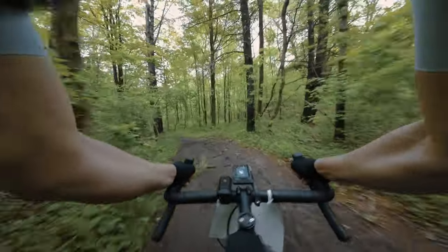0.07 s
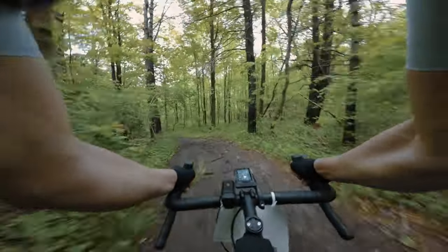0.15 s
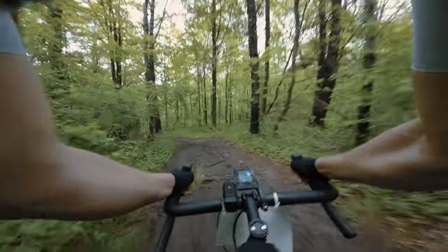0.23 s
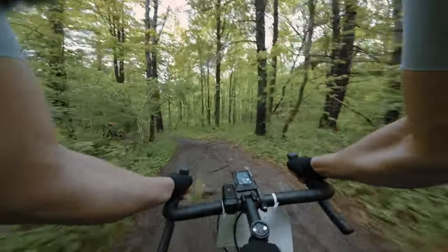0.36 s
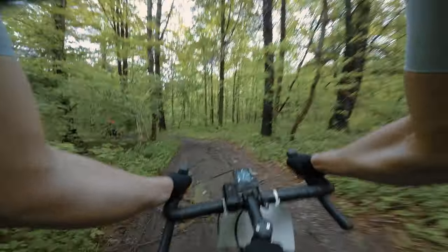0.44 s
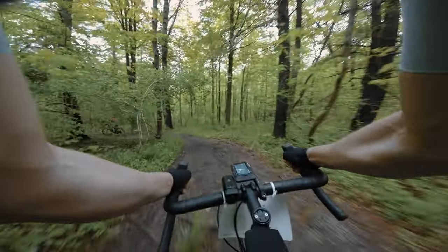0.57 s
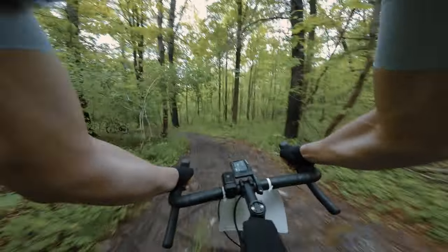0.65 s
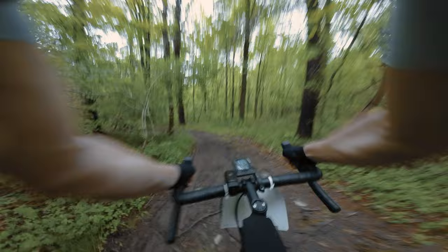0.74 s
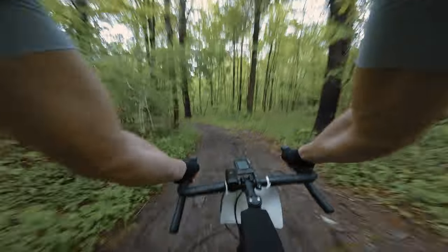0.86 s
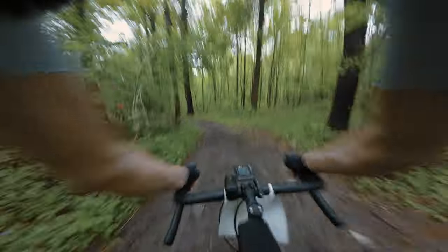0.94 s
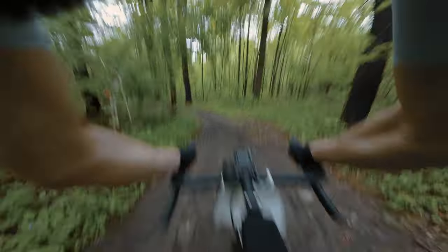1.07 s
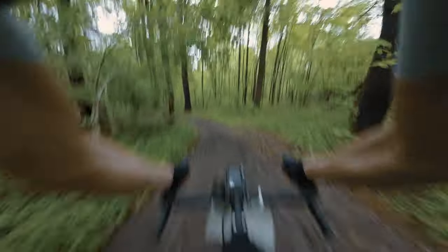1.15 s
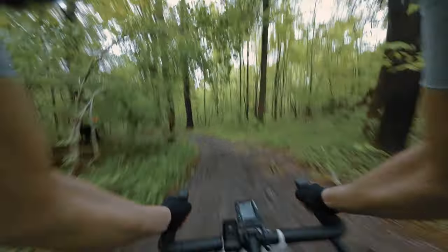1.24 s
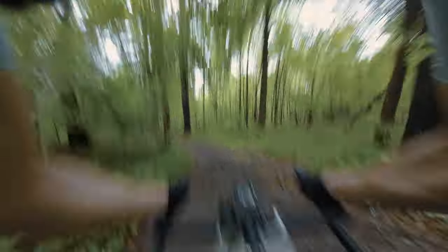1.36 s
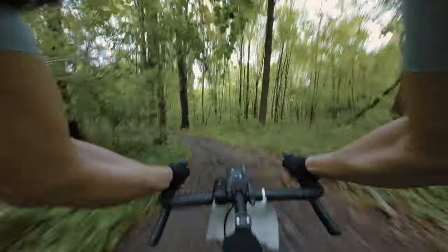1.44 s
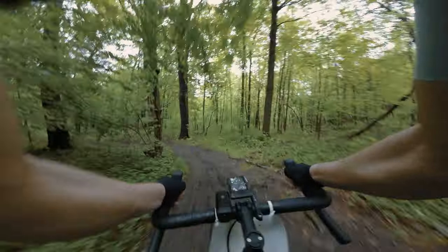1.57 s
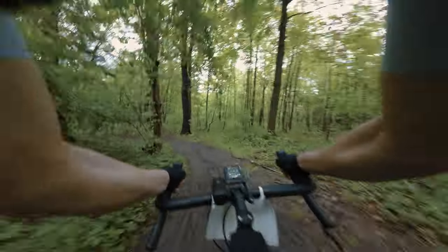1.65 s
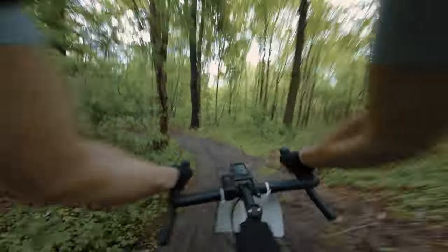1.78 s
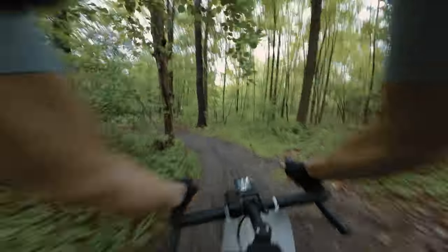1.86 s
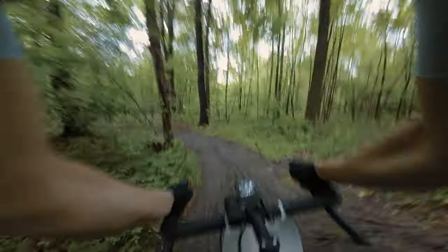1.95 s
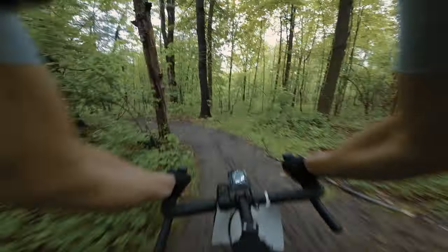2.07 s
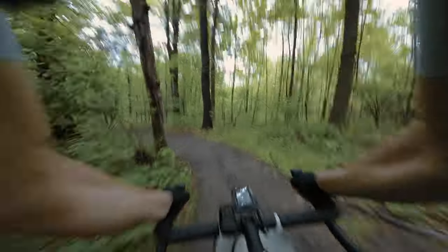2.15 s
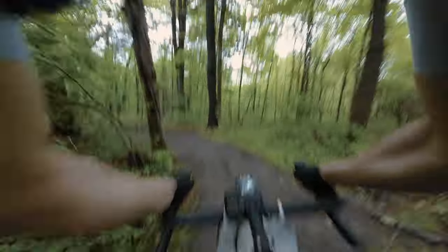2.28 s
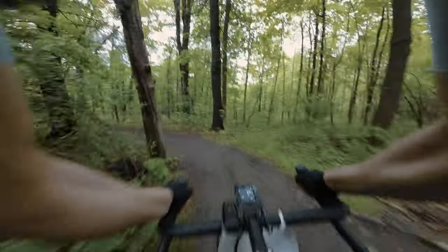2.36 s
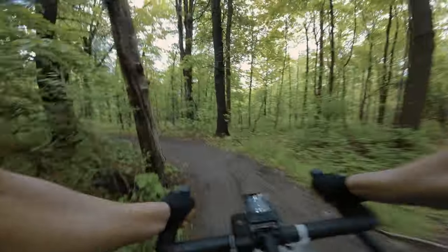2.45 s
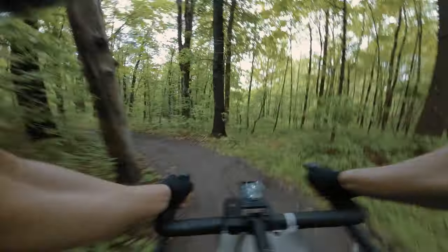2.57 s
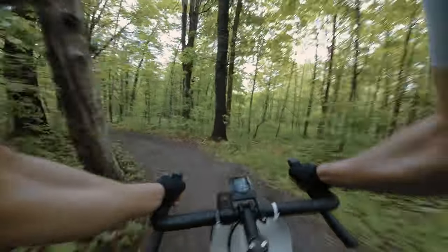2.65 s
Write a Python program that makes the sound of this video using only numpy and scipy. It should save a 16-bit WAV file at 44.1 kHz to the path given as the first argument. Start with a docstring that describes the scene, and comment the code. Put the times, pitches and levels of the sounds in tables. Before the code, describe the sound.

A bicycle coasts fast along a forest dirt trail, freewheel buzzing and tyres hissing under a thin wavering whistle; then roots knock and rattle the frame, with low wind thumps overloading a small chest-worn stereo microphone.

```python
"""Wind buffets the two microphone ports of a small camera on a rider's chest and overloads the right one.
The bicycle coasts fast down a dirt trail: a freewheel buzzes as pawl clicks ring the hub, tyres hiss as
patchy noise on grit, and a thin whistle, part tone and part narrow noise, wavers near 6 kHz.
Roots jolt the bike: hard blows knock the ringing frame and camera mount, small ones rattle, grit crunches."""
import sys
import numpy as np
from scipy import signal
from scipy.fft import rfft, irfft
from scipy.io import wavfile
from scipy.ndimage import uniform_filter1d

SR = 44100
rng = np.random.default_rng(int(sys.argv[2]) if len(sys.argv) > 2 else 0)


def generate_wav(signal):
    """Clip the signal to [-1, 1] and save it as 16-bit WAV at the path in sys.argv[1]."""
    frames = np.transpose(np.atleast_2d(signal))
    scaled = np.clip(frames, -1, 1) * 32767
    pcm = np.round(scaled).astype(np.int16)
    wavfile.write(sys.argv[1], SR, pcm)


N = 121275
T = np.arange(N) / SR  # seconds
RING_SAMPLES = 6000  # length of every frame ring

# Wind pressure at the ports. Each row: time in seconds, relative level in dB, left over right in dB.
BUFFET = [(0.0, -26.5, -23.5), (0.11, -26.5, 11), (0.16, -22, -9), (0.27, -24.5, 2), (0.31, -23.5, -11.5),
          (0.77, -27.5, -11), (0.9, -9, -15), (1.02, -20.5, -10.5), (1.05, -9, -11), (1.58, -18, -6),
          (1.62, -16, -18.5), (1.75, -34, 11), (1.83, -20.5, -8.5), (2.07, -19.5, -10), (2.12, -16, -14.5),
          (2.23, -17, 2), (2.3, -15, -16.5), (2.75, -33, 5)]
# Spectrum of the buffeting at the right port, then the left. Each row: frequency in Hz, relative dB per Hz.
RIGHT_COLOUR = [(1.8, -30), (3.0, 5.5), (16, 6.5), (24, -13), (35, -11), (64, -14.5), (93, -27),
                (260, -45.5), (340, -53), (570, -120)]
LEFT_COLOUR = [(1.8, -28), (3, -41), (8, 3), (22, -12.5), (35, -11.5), (64, -20), (100, -32), (260, -59),
               (400, -90), (600, -120)]
# Strongest pressure lumps on the right port. Each row: centre in seconds, length in seconds,
# signed height (full scale 1).
LUMPS = [(.887, 0.058, 0.94), (0.935, 0.048, -1.2), (1.068, 0.06, -1.01), (1.088, 0.043, -1.09),
         (1.117, 0.047, 1.1), (1.307, 0.054, 0.81)]
OPPOSED = 0.22  # share of the right port's source noise reversed into the left, before colouring
LUMP_ON_LEFT = -0.13  # share of each lump that reaches the left port

# Hard blows to frame and mount. Each row: start in seconds, peak of the ring in dB, crack in dB,
# centre of the ring in Hz, ring length as a share of the frame's.
KNOCKS = [(0.736, -26, -43, 225.6, 0.61), (0.832, -23, -43, 310, 0.54), (0.852, -16.5, -30.5, 482, 0.31),
          (0.888, -26.5, -48, 450, 1), (1.0, -22, -28, 218, 0.45), (1.023, -21, -28, 360.2, .6),
          (1.061, -28, -32, 497, 0.99), (1.125, -19.5, -36, 890, 0.16), (1.147, -21.5, -29, 410, 2.5),
          (1.199, -22.5, -31, 594, 1.3), (1.296, -22, -43, 302, .7), (1.308, -14.5, -31, 560, 0.99),
          (1.317, -8.5, -26, 380, 0.56), (1.325, -9, -28, 340, 0.49), (1.332, -17, -30, 400, 0.47),
          (1.368, -40, -23.5, 400, .5), (1.381, -11.5, -36, 457, 0.33), (1.397, -18, -33, 840, 0.13),
          (1.545, -25, -36, 397, 0.43), (1.5835, -15, -25, 256.4, 0.43), (1.634, -19.5, -31.5, 401, 0.25),
          (1.752, -24.5, -32, 584, .5), (1.761, -28, -30.5, 291, 0.39), (1.911, -23, -26, 402, .6),
          (1.916, -19.5, -20, 947, 0.3), (1.98, -30, -20.5, 1000, 0.88), (2.189, -31.5, -34, 299, .5),
          (2.1994, -12, -27, 553, 0.32), (2.208, -17.5, -27, 598, .5), (2.22, -21.5, -41, 600, 1.8),
          (2.266, -18.5, -29, 261, 0.36), (2.275, -17.5, -32, 197, .4), (2.606, -45, -24.5, 930, 0.44)]
# Modes of frame and camera mount. Each row: frequency in Hz, relative level in dB,
# full 60 dB decay time in seconds (each blow uses a share of it).
FRAME = [(131, 10, 0.057), (227, -4, 0.054), (333.5, -1.5, 0.099), (411.2, -0.5, 0.056), (520, -6.5, 0.02),
         (582.5, 1, 0.062), (722, 2, 0.027), (957, -5.5, 0.021), (1251, -10, 0.077)]
FOCUS_DB_PER_OCTAVE, RISE_S = 18, .0015  # loss away from the ring centre, onset time constant
CRACK_T60_S, CRACK_TREBLE_DB = 0.011, -19  # decay, white noise added to the crack band
SNAP_HZ, SNAP_T60_S, SNAP_DB = 1800, 0.0026, 4.5  # sharp start of each crack; dB over the crack level

# How hard the bike shakes. Each row: time in seconds, relative level in dB.
SHAKE = [(0.0, -63), (0.04, -40), (0.72, -45.5), (0.73, -34), (0.79, -41), (0.855, -25), (0.87, -28.5),
         (0.97, -43), (1.0, -23), (1.06, -21), (1.09, -34), (1.16, -26), (1.18, -37), (1.2, -28),
         (1.22, -37), (1.28, -43), (1.32, -14.5), (1.37, -33.5), (1.39, -39), (1.39, -18), (1.45, -34.5),
         (1.51, -26.5), (1.57, -31), (1.58, -18), (1.6, -38), (1.75, -43), (1.75, -27), (1.79, -33.5),
         (1.89, -58), (1.91, -22.5), (2.03, -37), (2.17, -38), (2.2, -22.5), (2.25, -35), (2.27, -39),
         (2.29, -36), (2.54, -57), (2.64, -32), (2.66, -39.5), (2.75, -35)]
RATTLE_PER_S, RATTLE_SPREAD_DB, RATTLE_DB = 1000, 4, -4.5  # mean blow rate, size spread, gain on SHAKE

# Grit thrown up in the jolts. Each row: time in seconds, relative level in dB.
GRIT = [(0.0, -50), (0.01, -46), (0.63, -48.5), (0.83, -47.5), (0.86, -29), (0.86, -39), (0.97, -44),
        (1.03, -35.5), (1.1, -45.5), (1.13, -35), (1.29, -43), (1.32, -27), (1.38, -35), (1.4, -34.5),
        (1.41, -41), (1.57, -36.5), (1.58, -31), (1.6, -38), (1.9, -45), (1.91, -32.5), (1.97, -32.5),
        (1.98, -39.5), (2.01, -42.5), (2.16, -47), (2.21, -30), (2.22, -38.5), (2.6, -48.5), (2.6, -33),
        (2.64, -53), (2.75, -54)]
# Spectrum of that crunch. Each row: frequency in Hz, relative dB per Hz.
CRUNCH_COLOUR = [(530, 13.5), (900, 1), (2200, 3), (2480, -2.5), (4940, -3.5), (9070, -18.5), (10200, -33),
                 (13600, -36), (15500, -45)]
CRUNCH_DB = 2  # gain on GRIT

# Tyres and air past the body, and the bright top of the crack at 1.91 s.
# Each row: time in seconds, relative level in dB.
HISS = [(0.0, -43), (0.24, -45.5), (0.61, -45.5), (0.72, -46), (0.74, -41.5), (0.79, -45), (0.89, -44.5),
        (0.97, -53.5), (1.0, -42.5), (1.1, -47), (1.13, -43), (1.3, -47.5), (1.32, -46.5), (1.59, -43.5),
        (1.77, -45.5), (1.78, -41.5), (1.86, -47.5), (1.905, -46), (1.912, -35.5), (1.935, -48.5),
        (2.37, -41.5), (2.6, -43.5), (2.61, -40), (2.73, -42.5), (2.75, -38)]
# Spectrum of the hiss. Each row: frequency in Hz, relative dB per Hz.
HISS_COLOUR = [(59, -48), (100, 3), (223, -21), (421, 0.5), (488, -23.5), (729, -13), (863, -6.5),
               (1070, -16.5), (1240, -14.5), (1660, -14), (2480, -8.5), (2880, -11), (3410, -6.5),
               (3950, -15.5), (5780, -7), (6160, -10), (6990, -12), (7610, -10.5), (8820, -16), (10000, -9),
               (11600, -13), (13500, -32.5), (15600, -18)]

# Freewheel buzz. Each row: time in seconds, level in dB.
FREEWHEEL = [(0, -45.5), (.2, -45.5), (.6, -43), (.75, -49.5), (.9, -46), (1.5, -44), (1.8, -44),
             (2.1, -45.5), (2.4, -47.5), (2.75, -51)]
# Mean click rate of the pawls. Each row: time in seconds, clicks per second.
PAWL_RATE = [(0, 65), (.2, 62.5), (.7, 62.3), (.9, 60), (1.5, 62), (1.8, 67), (2.1, 61.5), (2.75, 60)]
# Hub resonances, each passed twice. Each row: frequency in Hz, width of one pass in Hz, relative level in dB.
HUB = [(2020, 130, -2), (2470, 200, 6), (3260, 690, 3.5), (5100, 810, -6), (10650, 9900, 9)]
HUB_TOP_HZ, CLICK_SPREAD_DB = 11800, 1.5  # treble limit, spread of click sizes
RATE_WOBBLE = .02  # rms share of the click rate
PAWL_SNAP = 9  # clean click against the scrape noise

# Thin whistle. Each row: time in seconds, pitch in Hz, relative level in dB.
WHISTLE = [(0.0, 5980, -38.5), (0.04, 6290, -45), (0.11, 6110, -44), (0.12, 6091, -41.5),
           (0.3, 6240, -40.5), (0.33, 6370, -45), (0.38, 6250, -37), (0.4, 6524, -52), (0.46, 6400, -46),
           (0.47, 6390, -36), (0.5, 6220, -40), (0.54, 6449, -49), (0.56, 6170, -39), (0.6, 6060, -37.5),
           (0.61, 6300, -46), (0.63, 6440, -48), (0.65, 6091, -40), (0.73, 6309, -47), (0.79, 6010, -50),
           (0.8, 6490, -62), (0.91, 6503, -48.5), (1.0, 6063, -34), (1.02, 6175, -59), (1.07, 6110, -55),
           (1.08, 6300, -65), (1.18, 5900, -64), (1.21, 6432, -52), (1.22, 5870, -55), (1.27, 6507, -62),
           (1.28, 6050, -71), (1.34, 6420, -57), (1.35, 6007, -59), (1.46, 6427, -50), (1.49, 6100, -50),
           (1.52, 6590, -55), (1.55, 5920, -58), (1.59, 6530, -61), (1.62, 6158, -50), (1.64, 6440, -43),
           (1.69, 6347, -49), (1.72, 6250, -59), (1.81, 6390, -53), (1.83, 6080, -46), (1.9, 6100, -37),
           (1.94, 6100, -49), (1.97, 6550, -55), (2.02, 6440, -49), (2.12, 6500, -73), (2.24, 6400, -43),
           (2.3, 6080, -40), (2.32, 6393, -47), (2.4, 6030, -37), (2.55, 6410, -51), (2.57, 6150, -37.5),
           (2.7, 6540, -50), (2.75, 6190, -55)]
FLUTTER_HZ, BREAK_DB = 70, 2.2  # largest pitch flutter, rms of the level breaks
ROUGH_SHARE, CLEAR_SHARE = 0.65, .75  # amplitudes of the narrow noise and the clear sine

# Likeness of the two ports. Each row: frequency in Hz, left-right likeness (1 is identical).
SAME = [(60, -0.09), (130, 0.9), (290, 0.99), (640, 0.98), (1410, 0.98), (3100, 0.83), (6820, 0.37),
        (15000, -0.021)]
# Balance of the two ports. Each row: frequency in Hz, left over right in dB.
LEAN = [(60, -3.0), (110, -3.5), (200, 1.5), (380, 0), (700, -0.5), (1290, 0.5), (2380, -2), (4400, -3.5),
        (8120, -1.5), (15000, 5)]
EDGE_HZ = 15850  # upper limit of the sound


def gain_of(db):
    """Amplitude factor of a level in dB."""
    return 10 ** (np.asarray(db) / 20)


def evened(x):
    """Scale each channel to rms 1."""
    return x / np.sqrt(np.mean(x ** 2, -1, keepdims=True) + 1e-20)


def read(points, hz):
    """Read a spectrum table along a logarithmic frequency axis."""
    f, value = np.transpose(points)
    return np.interp(np.log(hz + 1), np.log(f + 1), value)


def curve(table, column):
    """Draw straight lines through one table column over time."""
    rows = np.array(table)
    return np.interp(T, rows[:, 0], rows[:, column])


def coloured(x, points):
    """Shape a sound by a spectrum table, at rms 1."""
    hz = np.fft.rfftfreq(N, 1 / SR)
    return evened(irfft(rfft(x) * gain_of(read(points, hz)), N))


def wander(rate_hz):
    """Random drift of rms 1: noise low-passed at rate_hz."""
    b, a = signal.butter(2, rate_hz, fs=SR)
    return evened(signal.lfilter(b, a, rng.standard_normal(N)))


def resonate(x, hz, width):
    """A resonance of gain 1 that can follow a pitch curve: shift to 0 Hz, smooth, shift back."""
    turn = np.exp(2j * np.pi * np.cumsum(hz * np.ones(len(x))) / SR)
    r = np.exp(-np.pi * width / SR)
    return 2 * (turn * signal.lfilter([1 - r], [1, -r], x / turn)).real


def ring(hz, db, t60):
    """One mode after a blow: a sine that decays exponentially."""
    t = T[:RING_SAMPLES]
    return gain_of(db - 60 * t / t60) * np.sin(2 * np.pi * hz * t)


def wind():
    """Lumpy pressure on each port, partly opposed, and a few big lumps on the right."""
    lean = curve(BUFFET, column=2) / 2
    left, right = rng.standard_normal((2, N))
    air = np.array([coloured(left - OPPOSED * right, LEFT_COLOUR), coloured(right, RIGHT_COLOUR)])
    air = air * gain_of(curve(BUFFET, column=1) + 2.0 + np.array([lean, -lean]))
    for s, length, height in LUMPS:
        lump = np.cos(np.pi * np.clip((T - s) / length, -.5, .5)) ** 2
        # The lump displaces the buffeting on the right port.
        air[1] = air[1] * (1 - np.minimum(1.85 * lump, 1)) + height * lump
        air[0] = air[0] + LUMP_ON_LEFT * height * lump
    return air


def knocks():
    """Single hard blows: frame modes nearest in pitch to the ring centre sound most, with a short crack."""
    out, t = np.zeros(N + RING_SAMPLES), T[:RING_SAMPLES]
    white = rng.standard_normal((len(KNOCKS), RING_SAMPLES))
    crack_band = signal.butter(2, [800, 3600], "band", fs=SR, output="sos")
    cracks = evened(signal.sosfilt(crack_band, white)) + gain_of(CRACK_TREBLE_DB) * white
    for (s, db, crack_db, centre_hz, share), noise in zip(KNOCKS, cracks):
        tone = np.zeros(RING_SAMPLES)
        for k, (hz, mode_db, t60) in enumerate(FRAME):
            focus_db = FOCUS_DB_PER_OCTAVE * abs(np.log2(hz / centre_hz))
            sign = (-1) ** (k // 2)  # modes start in differing directions
            tone += sign * ring(hz, mode_db - focus_db, t60 * max(share, .1))
        tone = tone * (1 - np.exp(-t / RISE_S))
        knock = gain_of(db) * tone / abs(tone).max()
        crack = gain_of(crack_db - 60 * t / CRACK_T60_S) * noise
        snap = ring(SNAP_HZ, crack_db + SNAP_DB, SNAP_T60_S)
        out[round(s * SR):][:RING_SAMPLES] += knock + crack + snap
    return out[:N]


def rattle():
    """Dense small blows, each on one random frame mode, ring as hard as the bike shakes."""
    size = gain_of(RATTLE_SPREAD_DB * np.minimum(rng.exponential(1, N), 3))
    struck = rng.random(N) < RATTLE_PER_S / SR
    blows = size * struck * rng.choice([-1, 1], N)
    mode = rng.integers(0, len(FRAME), N)
    body = np.zeros(N)
    for k, (hz, db, t60) in enumerate(FRAME):
        body += signal.oaconvolve(blows * (mode == k), ring(hz, db, t60 * .5))[:N]
    return gain_of(curve(SHAKE, column=1) + RATTLE_DB) * evened(body)


def crunch():
    """Grit thrown up in the jolts: coloured noise with a fast random flicker."""
    noise = rng.standard_normal((2, N))
    flicker = gain_of(1 * wander(rate_hz=130.0))  # 1 dB rms
    return gain_of(curve(GRIT, column=1) + CRUNCH_DB) * coloured(noise * flicker, CRUNCH_COLOUR)


def hiss():
    """Tyres on grit, air past the body and the top of the crack at 1.91 s: patchy noise, shared flicker."""
    noise = rng.standard_normal((2, N))
    _, _, z = signal.stft(noise, SR, nperseg=256, noverlap=192)
    patches = uniform_filter1d(rng.standard_normal(z.shape[1:]), 6, 0)  # smooth across pitch
    patches = uniform_filter1d(patches, 30, 1)  # smooth across time
    patchy = z * gain_of(1.98 * patches / patches.std())
    noise = signal.istft(patchy, SR, nperseg=256, noverlap=192)[1][:, :N]
    level_db = curve(HISS, column=1) + 6.5 + 1.58 * wander(rate_hz=45.0)
    return coloured(noise, HISS_COLOUR) * gain_of(level_db)


def freewheel():
    """Each pawl click is a clean tick and a short soft scrape of noise that ring the hub."""
    rate = curve(PAWL_RATE, column=1) * (1 + RATE_WOBBLE * wander(rate_hz=15.))
    turns = np.cumsum(rate) / SR  # clicks so far
    size = gain_of(CLICK_SPREAD_DB * rng.standard_normal(400))[turns.astype(int)]
    u = (turns % 1) / 0.082  # the scrape peaks 0.082 of the way to the next click
    tick = np.diff(np.floor(turns), prepend=0)
    scrape = size * (u * np.exp(-u) * rng.standard_normal((2, N)) + PAWL_SNAP * tick)
    hub = np.zeros((2, N))
    for channel, x in enumerate(scrape):
        for hz, width, db in HUB:
            hub[channel] += gain_of(db) * evened(resonate(resonate(x, hz, width), hz, width))
    hub = signal.sosfilt(signal.butter(10, HUB_TOP_HZ, fs=SR, output="sos"), hub)
    return evened(hub) * gain_of(curve(FREEWHEEL, column=1))


def whistle():
    """A thin tone, part rough narrow noise and part sine, that flutters in pitch and strength."""
    hz = curve(WHISTLE, column=1) + FLUTTER_HZ * np.tanh(1.29 * wander(rate_hz=69.5))
    noise = rng.standard_normal((2, N))
    rough = np.array([evened(resonate(resonate(x, hz, 140.0), hz, 140.0)) for x in noise])
    clear = np.sin(2 * np.pi * np.cumsum(hz) / SR)
    level_db = curve(WHISTLE, column=2) + 3.0 + BREAK_DB * wander(rate_hz=34.0)
    return (ROUGH_SHARE * rough + CLEAR_SHARE * clear) * gain_of(level_db)


def ports(x, other):
    """Two nearby ports: alike in the bass, less alike and unequal in the treble."""
    hz = np.maximum(np.fft.rfftfreq(N, 1 / SR), 200)
    same, lean = np.clip(read(SAME, hz), 0, 1), gain_of(read(LEAN, hz) / 2)
    a, b = rfft(x), rfft(other)
    shared, opposed = np.sqrt((1 + same) / 2) * a, np.sqrt((1 - same) / 2) * b
    return irfft(np.array([(shared + opposed) * lean, (shared - opposed) / lean]), N)


def scene():
    """Wind at each port, airborne sounds spread over both, frame sounds equal in both."""
    body, grit = rattle(), crunch()
    air = wind()
    first, second = hiss() + grit + freewheel() + whistle()
    return air + ports(first, second) + body + knocks()


def record(dry):
    """Hard overload at full scale, then the band limit."""
    low_pass = signal.firwin(511, EDGE_HZ, window=("kaiser", 9), fs=SR)
    return signal.oaconvolve(np.clip(dry, -1, 1), low_pass[None], "same")


dry = scene()
out = record(dry)
generate_wav(out)
```